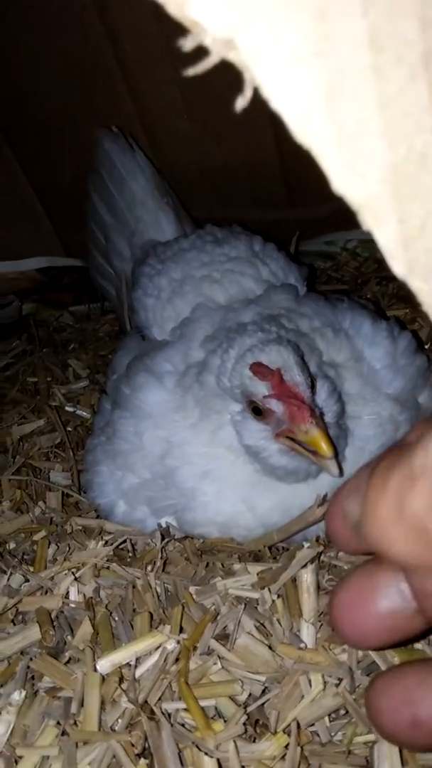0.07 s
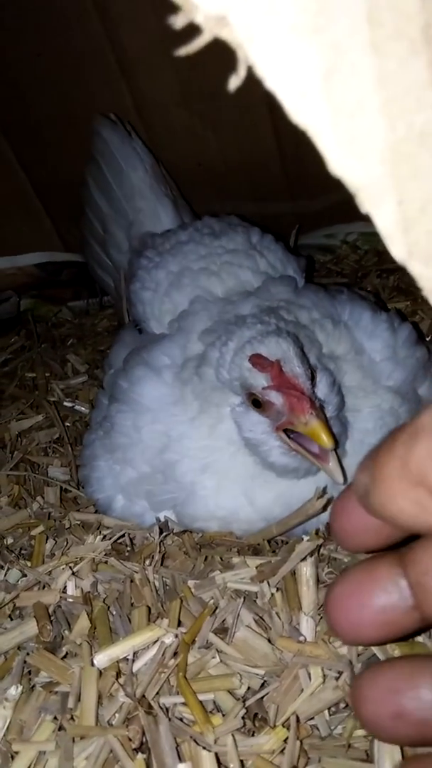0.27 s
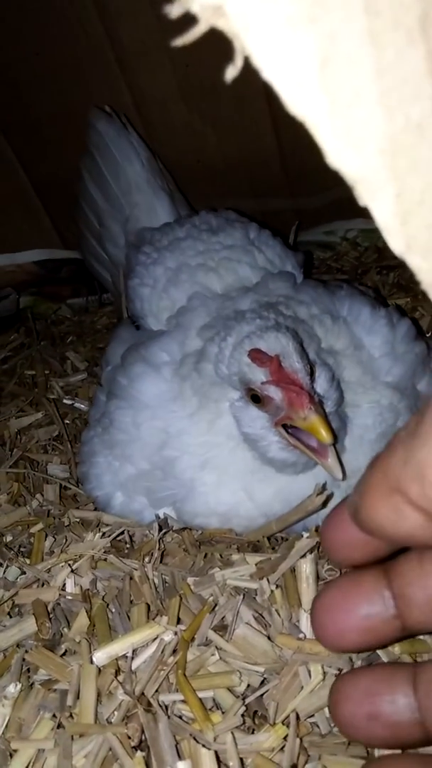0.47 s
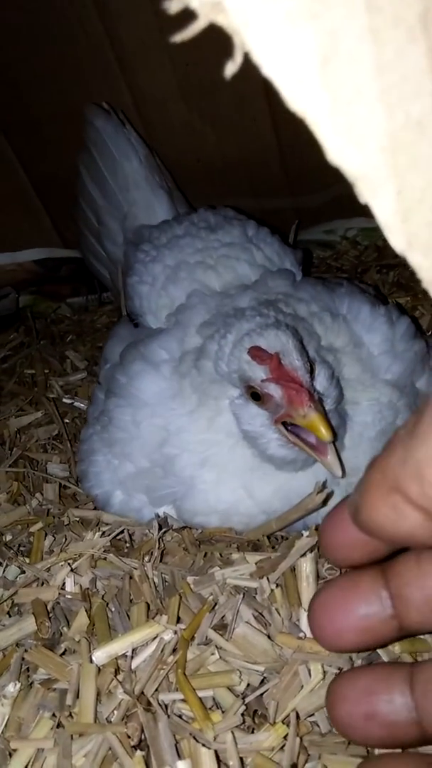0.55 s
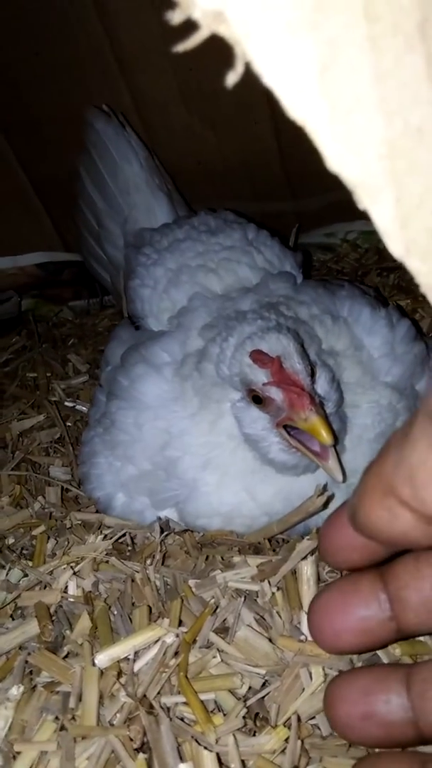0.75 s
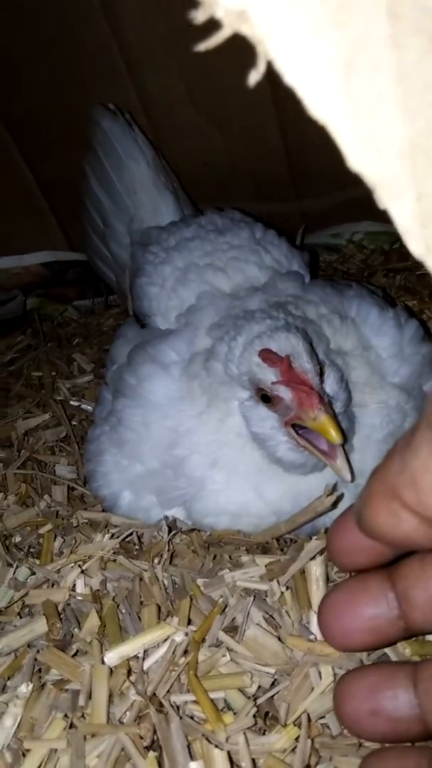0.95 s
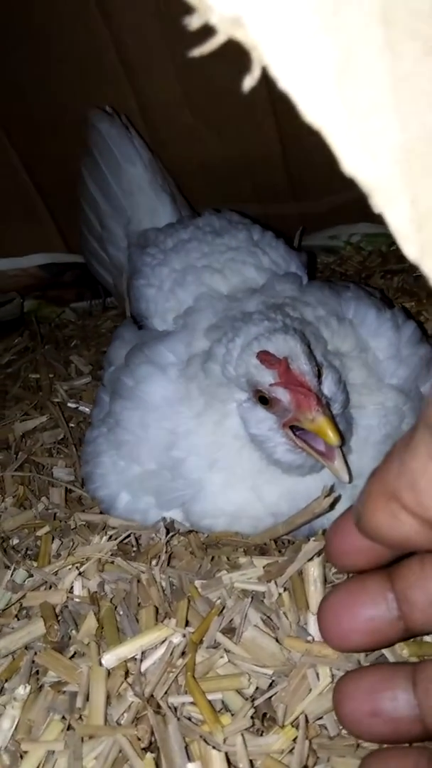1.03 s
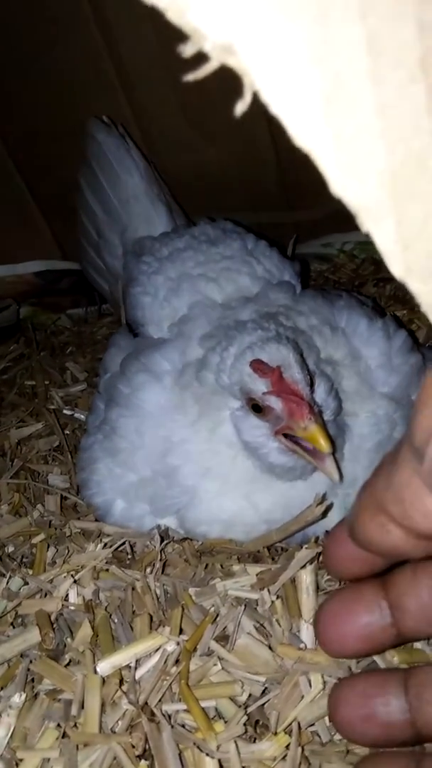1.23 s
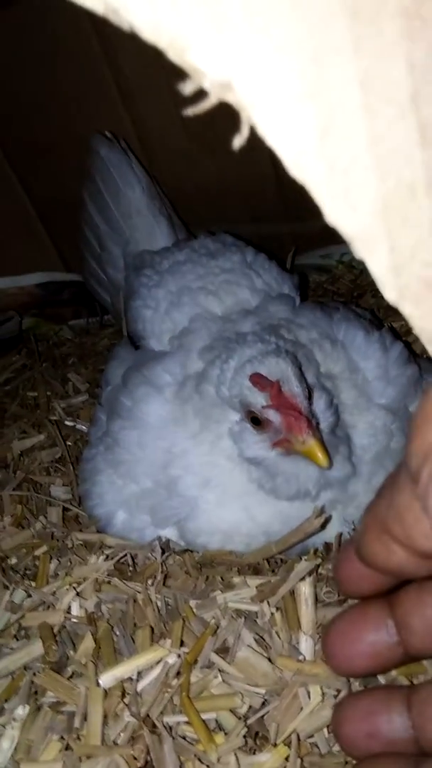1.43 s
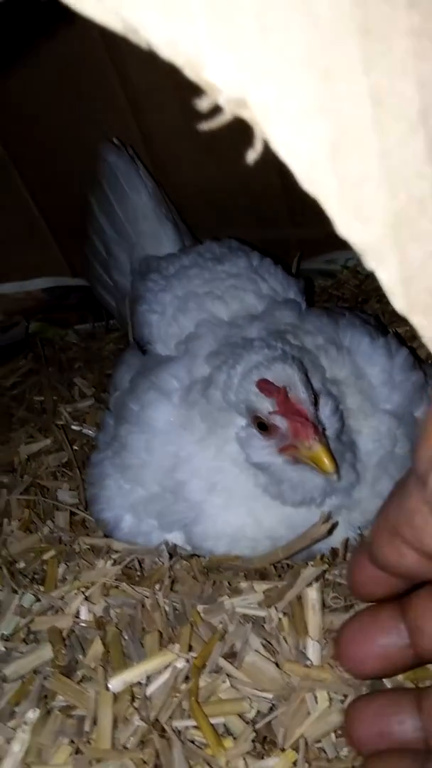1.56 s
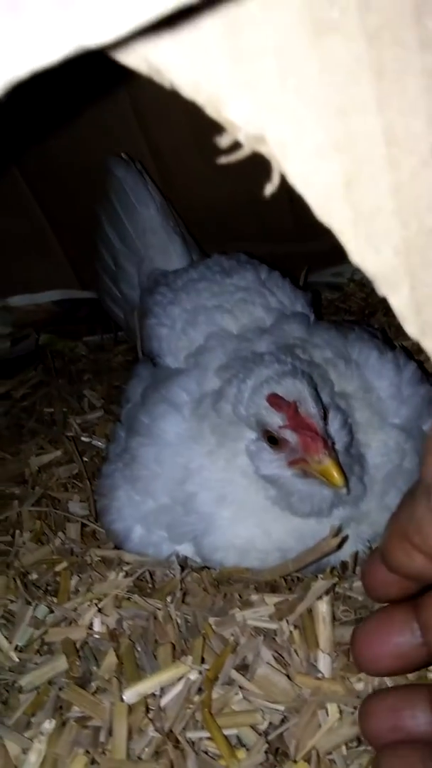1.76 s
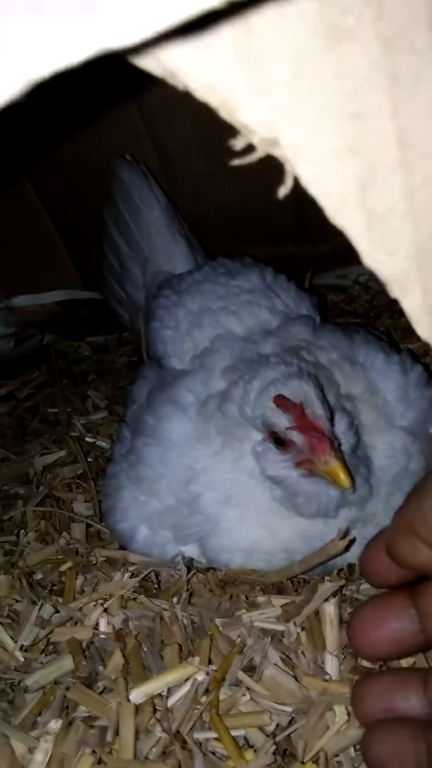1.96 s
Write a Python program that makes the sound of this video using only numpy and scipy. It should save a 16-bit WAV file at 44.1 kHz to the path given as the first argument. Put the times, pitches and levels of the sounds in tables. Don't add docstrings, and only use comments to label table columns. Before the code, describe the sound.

A hen's harsh raspy growl starts as a quick trill and sinks to a short moan

```python
import sys
import numpy as np
from scipy import signal
from scipy.fft import rfft, irfft
from scipy.io import wavfile
from scipy.ndimage import uniform_filter1d

SR = 44100
rng = np.random.default_rng(int(sys.argv[2]) if len(sys.argv) > 2 else 0)


def to_wav(s):
    ch = np.atleast_2d(s).T
    pcm = np.round(np.clip(ch, -1, 1) * 32767)
    wavfile.write(sys.argv[1], SR, pcm.astype(np.int16))


def volts_from_db(level):
    exponent = np.asarray(level, float) / 20
    return 10 ** exponent


N = 88200
T = np.arange(N) / SR


def evened(x):
    return x / np.sqrt(np.mean(x ** 2) + 1e-20)


def read(points, hz):
    f, value = np.transpose(points)
    return np.interp(np.log(hz + 1), np.log(f + 1), value)


def tracks(points):
    s, *columns = np.transpose(points)
    return [np.interp(T, s, column) for column in columns]


def ramp(from_s, to_s):
    return np.clip((T - from_s) / (to_s - from_s), 0, 1)


def bump(middle, length):
    return np.cos(np.pi * np.clip((T - middle) / length, -.5, .5)) ** 2


def wander(hz):
    f = np.arange(N // 2 + 1) * SR / N
    return evened(irfft(rfft(rng.standard_normal(N)) / (1 + (f / hz) ** 4), N))


def tone(hz):
    return np.sin(2 * np.pi * np.cumsum(hz) / SR)


def resonate(x, hz, width):
    r = np.exp(-np.pi * 1.5 * width / SR)
    turn = np.exp(2j * np.pi * np.cumsum(hz * np.ones(N)) / SR)
    return 2 * (turn * signal.lfilter([(1 - r) ** 2], [1, -2 * r, r * r], x / turn)).real


def noise(points, patchy_db):
    frames, hz = N // 256 + 5, np.fft.rfftfreq(1024, 1 / SR)
    a, b, patches = rng.standard_normal((frames, 513, 3)).T
    patches = uniform_filter1d(patches, size=14, axis=0)
    patches = evened(uniform_filter1d(patches, size=8, axis=1))
    z = (a + 1j * b) * volts_from_db(read(points, hz)[:, None] + patchy_db * patches)
    return evened(signal.istft(z, nperseg=1024, noverlap=768)[1][:N])


# (time [s], pitch [Hz], effort [dB], roughness [0-1], beak opening [0-1], squeak level [dB])
VOICE = [(0, 520, -25.5, .62, 0, -48.5), (.17, 539, -25, .65, 0.23, -54.5),
         (.3, 550.5, -21, 0.71, 0.56, -62.5), (.4, 548.2, -22, .78, 0.53, -61),
         (.49, 545.4, -24.5, .8, 0.74, -27), (.55, 540.9, -22.5, .85, 0.63, -25.5),
         (.8, 545.7, -20.5, .85, 0.76, -22), (.9, 547, -17.5, .85, 0.89, -20),
         (1.2, 551.5, -16.5, 0.78, 0.91, -19), (1.3, 532.8, -17, 0.77, 0.96, -25.5),
         (1.34, 511.5, -23, .8, 1.05, -20.5), (1.4, 497.3, -24.5, .8, 1.01, -55),
         (1.432, 495.2, -25, .8, 1., -39), (1.45, 479.6, -29, 0.9, 0.8, -73.5),
         (1.5, 471.6, -31.5, .8, 0.4, -62), (1.52, 454.5, -38, .8, 0.83, -79),
         (1.555, 419, -34, .8, 0, -69.5), (1.58, 413.3, -63, 0.8, 0.14, -80), ]


def growl():
    hz, effort_db, rough, beak, _ = tracks(VOICE)
    gate, dip = trill()
    hz = hz * (1 - dip)
    push = volts_from_db(effort_db) * gate
    drive = push * volts_from_db(10) * syrinx(hz, rough)
    hum = tone(2 * hz * (1 + .03 * wander(hz=90))) * volts_from_db(-13 + 2.5 * wander(hz=50))
    hum_end_s = 1.6
    return push * hum * np.clip((hum_end_s - T) / 0.094, 0, 1) + mouth(drive) + throat(drive, beak)


# (middle [s], length [s], level [dB])
TRILL = [
    (0.017, 0.039, -2.5),
    (0.071, 0.026, 0.5),
    (0.122, 0.027, 0.5),
    (0.175, 0.03, 0.5),
    (0.225, 0.024, 0),
    (.274, .034, -0.5),
    (0.316, 0.031, 0),
    (0.364, 0.04357, -2.5),
    (0.404, 0.04745, 0),
    (0.45, 0.05445, 2.5),
]


def trill():
    gap_db, dip_share = -46.5, .12
    merged = ramp(0.16, 0.5)
    gate = sum(volts_from_db(db) * bump(m, length) ** 0.64 for m, length, db in TRILL)
    gate = np.maximum(gate, volts_from_db(gap_db * (1 - merged)))
    dip = dip_share * (1 - merged) * sum(bump(m, length) for m, length, db in TRILL)
    return gate, dip


def syrinx(hz, rough):
    jitter, shimmer_db, puff = .2, 1.5, 1.
    smear = 0.059
    turns = np.cumsum(hz * (1 + jitter * rough ** 2 * wander(hz=255.9))) / SR
    folds = evened(sum(np.cos(2 * np.pi * k * turns + smear * k ** 2) for k in range(1, 27)))
    folds = folds * volts_from_db(shimmer_db * rough * wander(hz=288))
    puffs = evened((2.0 + np.exp(-(turns % 1) / 0.15)) * rng.standard_normal(N))
    return (folds + puff * rough * puffs) / np.sqrt(1 + (puff * rough) ** 2)


def dulled(drive):
    return signal.sosfilt(signal.butter(N=6, Wn=5900, fs=SR, output="sos"), drive)


# (time [s], frequency [Hz], narrowness [0-1], level [dB])
MOUTH = [
    (0, 1905, 0.42, 1.5),
    (.17, 2050, 0.57, 3.5),
    (.27, 2330, 0.36, 2),
    (1.22, 2500, 0.84, 2.5),
    (1.33, 2270, 0.84, 2),
    (1.4, 2000, 0.5, 5),
    (1.47, 1860, 0.1, 3),
    (1.6, 1470, 0, -7),
]


def mouth(drive):
    hz, narrow, level_db = tracks(MOUTH)
    dull = dulled(drive)
    sharp = resonate(dull, hz, width=157)
    broad = resonate(dull, hz, width=333)
    return volts_from_db(level_db) * (narrow * sharp + (1 - narrow) * broad)


# (frequency [Hz], width [Hz], beak shut [dB], beak open [dB])
THROAT = [(520, 380, -33.5, -21.5), (929, 121.6, -0.5, -9.5), (1115, 52, 2, -2), (1340, 340, -25, -16),
          (1728, 200, -23, -10), (2000, 160, -2.5, -11), (2939, 250, -6.5, 1), (3659, 308, -23.5, 0.5),
          (4393, 240, -19.5, -5), (4780, 96, -20, -3.5), (5298, 260, -29, -10.5),
          (5970, 760, -57, -21), (7240, 180, -66, -36.5), (8690, 230, -78, -39.5), (9480, 390, -76.5, -41.5),
        (11300, 180, -77, -40.5), (13300, 580, -82, -48.5)]


def throat(drive, beak):
    dull = dulled(drive)
    clear = volts_from_db(-7 * ramp(1.3, 1.36))
    out = np.zeros(N)
    for k, (hz, width, shut_db, open_db) in enumerate(THROAT):
        opening = beak if hz < 8000 else np.maximum(beak, 0) ** 3
        gain = volts_from_db(shut_db + (open_db - shut_db) * opening)
        if 2500 < hz < 4600:
            gain = gain * clear
        out += (-1) ** k * gain * resonate(dull if hz < 5800 else drive, hz, width)
    return out


# (time [s], pitch [Hz], level [dB])
MOAN = [
    (1.22, 545, -93),
    (1.31, 520.9, -24.5),
    (1.39, 502, -22),
    (1.43, 496.4, -21),
    (1.45, 481.2, -24.5),
    (1.501, 470.6, -25.5),
    (1.523, 452, -32),
    (1.552, 420.6, -36),
    (1.6, 410, -100),
]
# (beak open [dB], beak shut [dB])
PARTIALS = [(-22, -11), (-13, 0), (-9, -3), (-1, -7), (-4, -21), (-4, -25), (-2, -18), (-14, -32),
            (-12, -30), (-13, -30)]
HALVES_DB = [-36, -26, -27.5]


def moan():
    hz, level_db = tracks(MOAN)
    turns = np.cumsum(hz * (1 + .006 * wander(hz=61.7))) / SR
    shut_s, early_s, early_db_per_s = 1.477, 1.372, 26
    shut = ramp(1.411, shut_s)
    tired_db = early_db_per_s * np.clip(T - early_s, 0, shut_s - early_s) * (4.0 - shut)
    out = np.zeros(N)
    for k, (open_db, shut_db) in enumerate(PARTIALS):
        partial_db = open_db + (shut_db - open_db) * shut - max(k - 3, 0) * tired_db
        partial_db = partial_db + (2.03 - 1.9 * shut) * wander(hz=45.3)
        out += volts_from_db(partial_db) * np.sin(2 * np.pi * (k + 1) * turns + k ** 2)
    halves = sum(volts_from_db(db) * np.sin(2 * np.pi * (k + 1.5) * turns) for k, db in enumerate(HALVES_DB))
    return out * volts_from_db(level_db) + 1.1 * halves * bump(middle=1.492, length=0.025)


# (middle [s], length [s], from [Hz], to [Hz], level [dB])
SQUEAKS = [(.016, .014, 1950, 1740, -35), (0.033, 0.016, 1900, 2000, -32), (0.078, 0.031, 1932, 2080, -33),
           (.131, 0.035, 1950, 2016, -25), (0.176, 0.017, 2900, 2400, -32),
           (0.18, 0.028, 2016, 2000, -25.5), (0.218, 0.016, 2700, 2116, -24),
           (0.232, 0.024, 2300, 2180, -26), (0.229, 0.026, 3050, 2900, -33),
           (0.262, 0.014, 2850, 2115, -18.5), (0.275, 0.013, 2750, 2300, -17),
           (0.274, 0.036, 2950, 2945, -28), (0.305, 0.016, 2900, 2080, -18.5),
           (0.319, .02, 2950, 3020, -29), (0.324, 0.014, 2100, 2463, -23.5),
           (0.331, 0.023, 2800, 2780, -27.5), (0.346, 0.013, 2850, 2144, -16),
           (0.357, 0.02, 2950, 3065, -21.5), (.365, 0.0065, 2700, 2295, -10.5),
           (0.37, .014, 2200, 2130, -23.5), (0.381, 0.012, 2350, 2701, -18), (.387, 0.013, 2700, 2118, -17),
           (0.398, .018, 3050, 2950, -23), (0.408, 0.01, 2600, 2320, -15.5),
           (0.411, 0.024, 2950, 2895, -24), (0.421, 0.046, 2350, 2174, -24),
           (0.447, 0.0092, 2700, 2310, -13), (.463, 0.01, 2750, 2210, -14),
           (0.439, 0.02, 3350, 2880, -28.5), (.457, 0.026, 2950, 3060, -22.5),
           (.476, .016, 3250, 2776, -21), (0.484, .01, 2800, 2396, -19), (0.496, .014, 2800, 2310, -17.5),
           (.532, 0.023, 2621, 2420, -14.5)]


def single_squeaks():
    out = np.zeros(N)
    for m, length, from_hz, to_hz, db in SQUEAKS:
        hz = from_hz + (to_hz - from_hz) * np.clip((T - m) / length + .5, 0, 1)
        out += volts_from_db(db) * bump(m, length) * tone(hz)
    return out


PAIR_HZ = [-80, 110]


def squeak_chains():
    squeak_hz, per_s, swoop_hz, stray_hz = 2470, 84, 240, 70
    held, trade_db = .15, 4
    level_db = tracks(VOICE)[-1]
    out = np.zeros(N)
    for apart_hz in PAIR_HZ:
        phase = np.cumsum(per_s * volts_from_db(3. * wander(hz=30.07))) / SR % 1
        hz = squeak_hz + apart_hz + swoop_hz * (.5 - phase) + stray_hz * wander(hz=60.24)
        level = 1.175 * volts_from_db(level_db + trade_db * wander(hz=35.8))
        out += level * (held + (1 - held) * np.sin(np.pi * phase)) * tone(hz)
    return out


# (frequency [Hz], t60 [s])
BOX = [(300, .45), (900, .32), (1500, .42), (2050, .33), (2400, .14), (3100, .14), (3600, .27), (5500, .27),
       (9000, .16)]


def box(x):
    taps = np.zeros(SR // 2)
    at = np.arange(200, SR // 2 - 20, 20)
    taps[at + rng.integers(0, 20, len(at))] = rng.choice([-1., 1.], len(at))
    hz, t, z = signal.stft(taps, SR, nperseg=256)
    tail = signal.istft(z * volts_from_db(-60 * t / read(BOX, hz)[:, None]), SR, nperseg=256)[1]
    return signal.fftconvolve(x, tail / np.linalg.norm(tail))[:N]


# (frequency [Hz], level [dB], t60 [s])
RING = [(465, -58, .3), (935, -60, .4), (1400, -55, .75)]


def box_ring():
    since = np.maximum(T - 1.56, 0)
    out = np.zeros(N)
    for hz, db, t60 in RING:
        level = volts_from_db(db - 60 * since / t60 + 2.0 * wander(hz=25))
        out += level * tone(hz + 7 * wander(hz=14))
    return out * np.minimum(since / 0.018, 1)


# (time [s], tick [dB], thud [dB], crisp top relative to tick [dB])
TICKS = [
    (1.74, -60, -51, -21.5),
    (1.755, -64.5, -50, -11),
    (1.786, -68, -56, -30.5),
    (1.835, -70, -54.5, -30),
    (1.873, -62, -55, -7),
    (1.901, -67, -65.5, -4),
    (1.949, -67.5, -65.5, -3),
]


def straw():
    tick, thud, crisp = np.zeros((3, N))
    for s, tick_db, thud_db, top_db in TICKS:
        since = np.maximum(T - s, 0)
        shape = volts_from_db(tick_db - 60 * since / 0.15) * np.minimum(since / 0.00522, 1)
        tick += shape
        crisp += volts_from_db(top_db) * shape
        thud += volts_from_db(thud_db - 60 * since / 0.1) * np.minimum(since / 0.0049, 1)
    grain, low_grain = rng.standard_normal((2, N))
    tick_noise = evened(resonate(grain, 2320, 540) + volts_from_db(-14.0) * resonate(grain, 1270, 1110.0))
    crisp_noise = evened(resonate(grain, 4340, 1800))
    thud_noise = evened(resonate(low_grain, 141, 110))
    return tick * tick_noise + crisp * crisp_noise + thud * thud_noise


# (frequency [Hz], density [dB per Hz])
HISS = [(1470, -38), (2500, -12), (3270, -16), (4400, 0.5), (6300, -0.5), (6900, -32.5), (9000, -35),
        (14000, -43)]


def hiss():
    level_db = -43.5 - 73 * np.maximum(T - 0.17, 0)
    return volts_from_db(level_db) * noise(HISS, patchy_db=1.5)


# (frequency [Hz], density [dB per Hz])
TOP = [(5000, -40), (7000, -2.5), (9000, 0.5), (14000, -4.5)]


def top_hiss():
    return volts_from_db(-78 - 9 * ramp(1.7, 1.82)) * noise(TOP, patchy_db=2.0)


# (frequency [Hz], density [dB per Hz])
AIR = [(20, -56), (48, -31), (68, -13.5), (160, -9), (280, -20), (900, -23.5), (2500, -38.5), (3400, -47),
       (14000, -63)]


def air():
    return volts_from_db(-66.5) * noise(AIR, patchy_db=4.0)


# (time [s], level [dB])
RUMBLE = [(0.0, -86), (0.3, -60.5), (0.55, -73.5), (0.62, -53.5), (0.73, -64), (1.08, -63), (1.33, -68),
          (1.35, -59.5), (1.47, -79), (1.5, -67), (1.69, -63), (1.75, -59), (1.93, -61.5), (2.0, -82)]


def rumble():
    level_db, = tracks(RUMBLE)
    low = resonate(rng.standard_normal(N), 74, 36)
    return volts_from_db(level_db) * evened(resonate(low, 74, 36))


def scene():
    hen = growl() + moan() + single_squeaks() + squeak_chains()
    low_cut = signal.butter(N=8, Wn=407, btype="high", fs=SR, output="sos")
    hen = signal.sosfilt(low_cut, hen)
    enclosed = hen + volts_from_db(-13) * box(hen) + box_ring()
    return (enclosed + straw() + hiss() + top_hiss() + air() + rumble())[None]


def roll_off(x):
    return signal.sosfilt(signal.butter(12, 14140, fs=SR, output="sos"), x)


def record(dry):
    return roll_off(dry)


dry = scene()
out = record(dry)
to_wav(out)
```